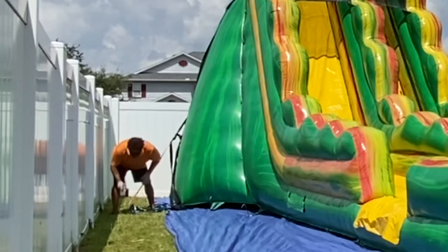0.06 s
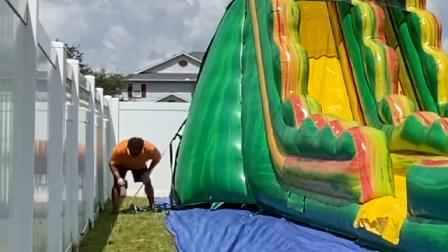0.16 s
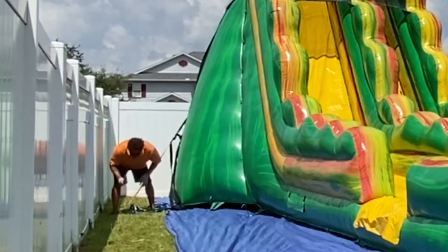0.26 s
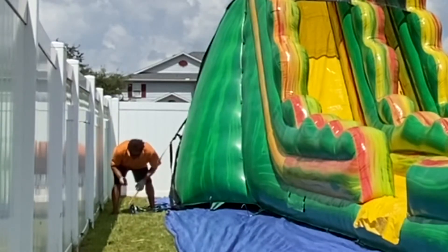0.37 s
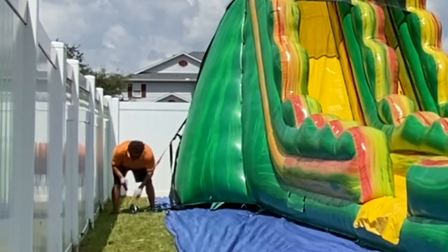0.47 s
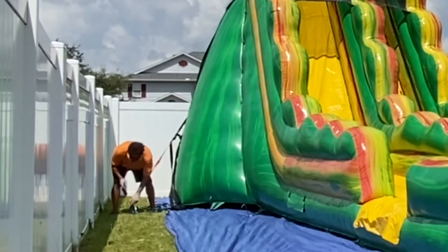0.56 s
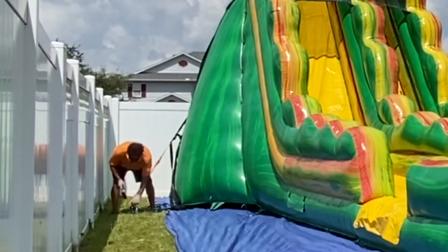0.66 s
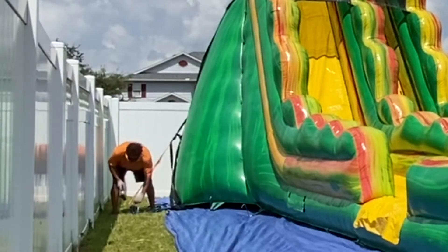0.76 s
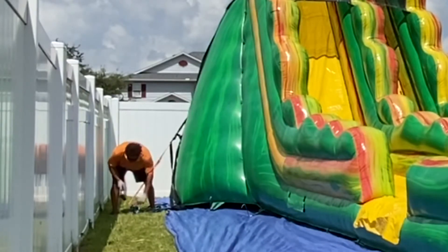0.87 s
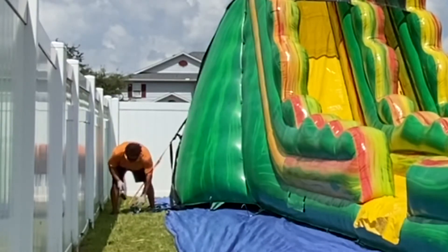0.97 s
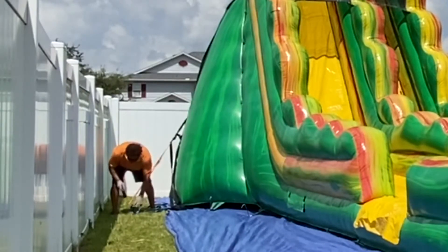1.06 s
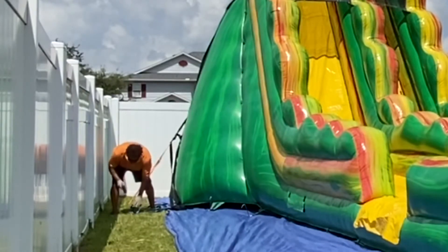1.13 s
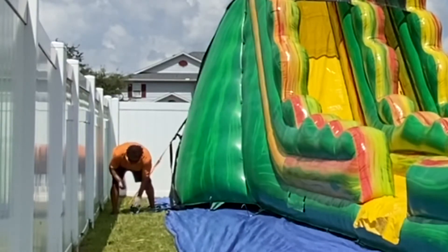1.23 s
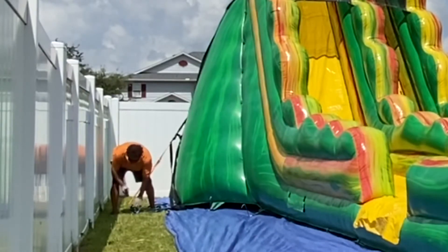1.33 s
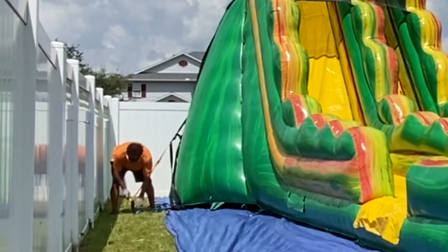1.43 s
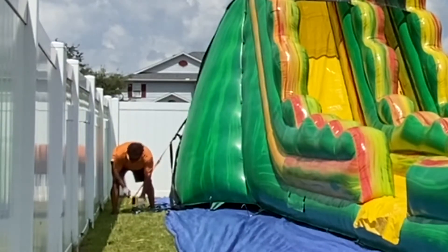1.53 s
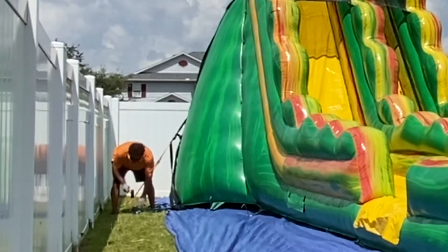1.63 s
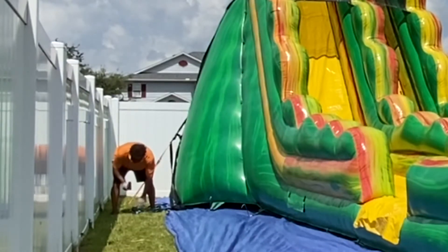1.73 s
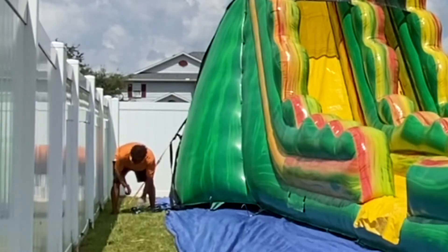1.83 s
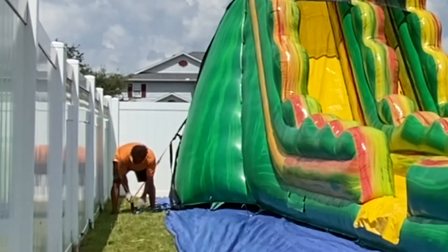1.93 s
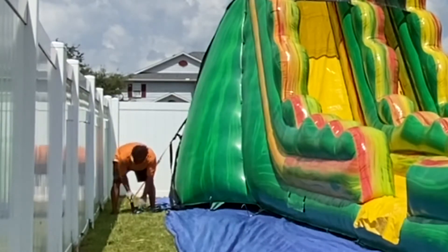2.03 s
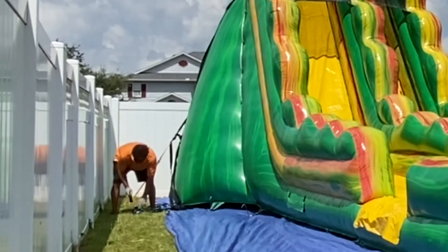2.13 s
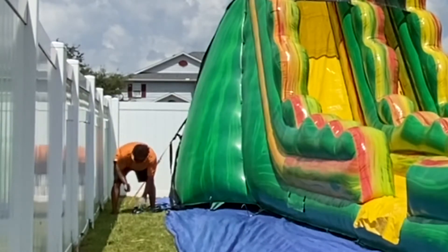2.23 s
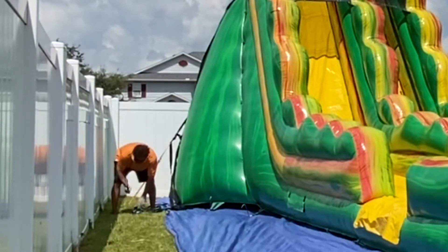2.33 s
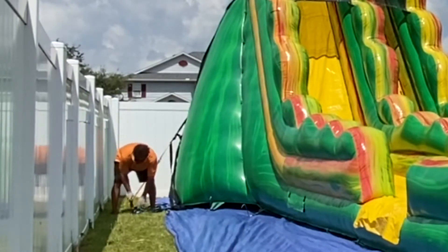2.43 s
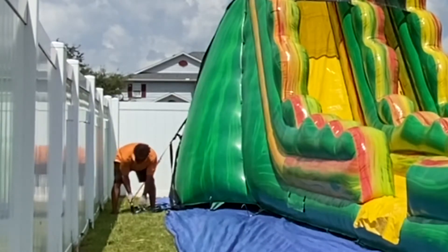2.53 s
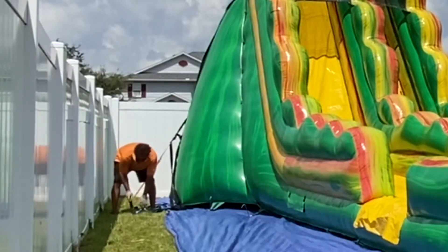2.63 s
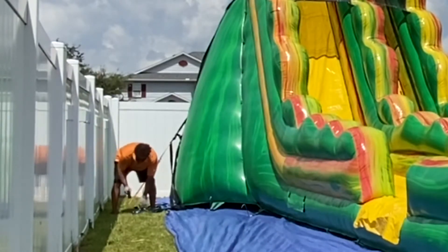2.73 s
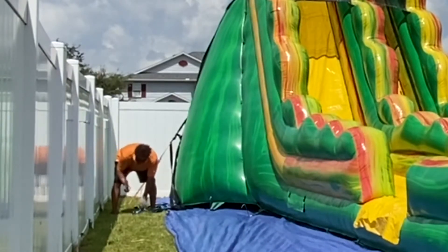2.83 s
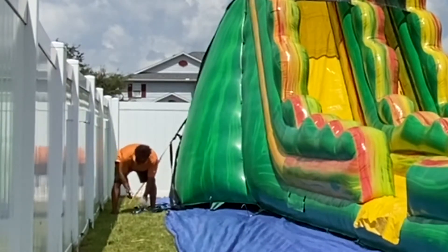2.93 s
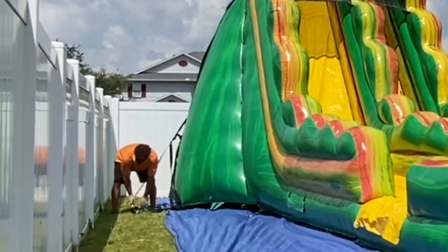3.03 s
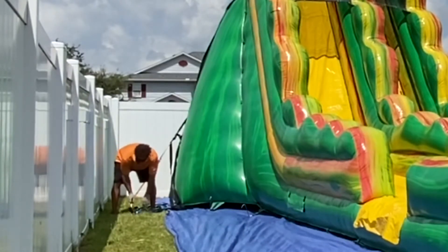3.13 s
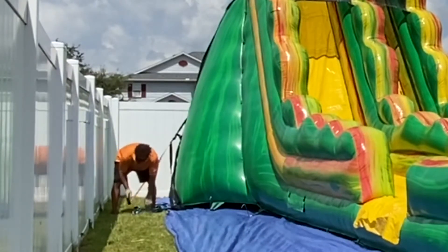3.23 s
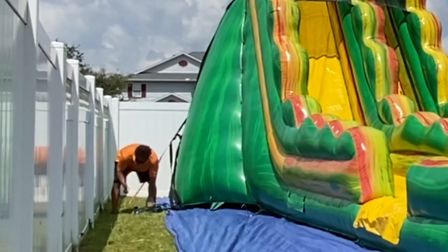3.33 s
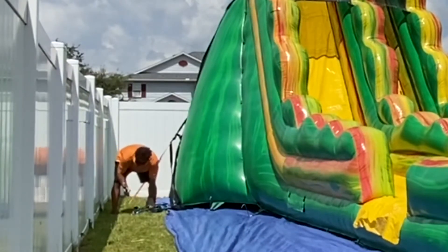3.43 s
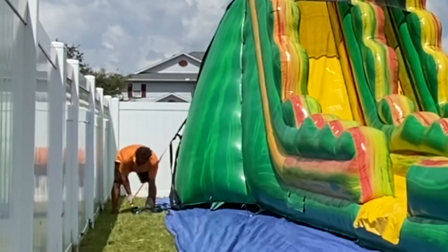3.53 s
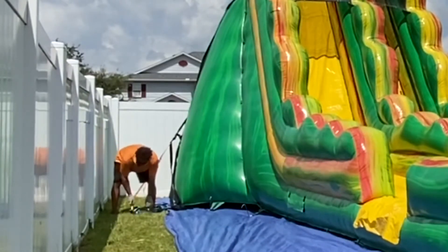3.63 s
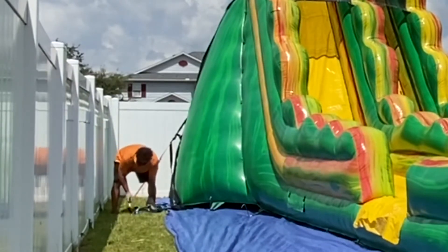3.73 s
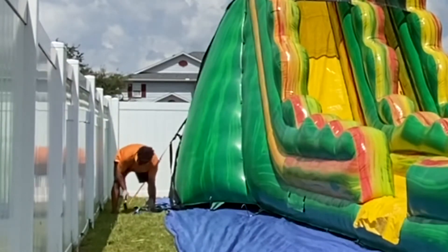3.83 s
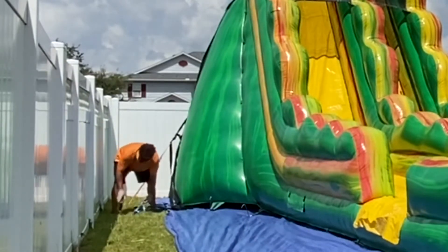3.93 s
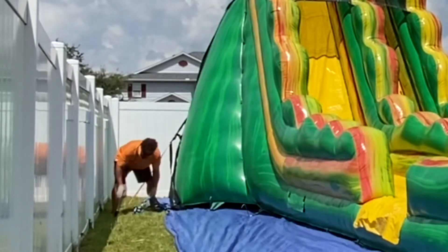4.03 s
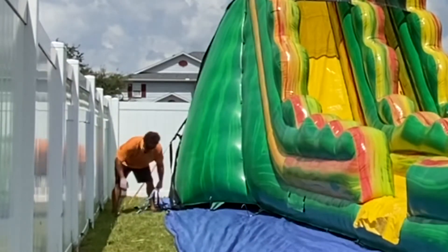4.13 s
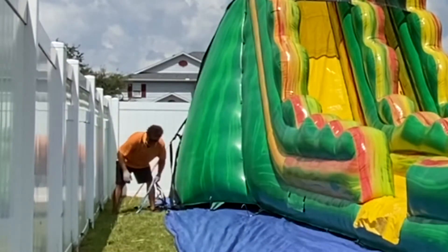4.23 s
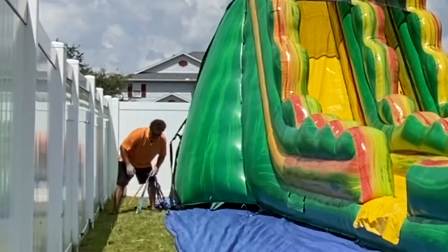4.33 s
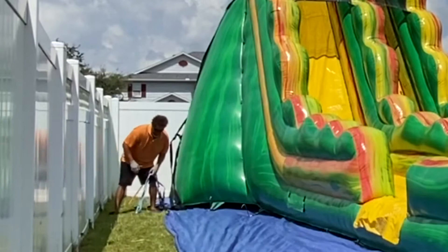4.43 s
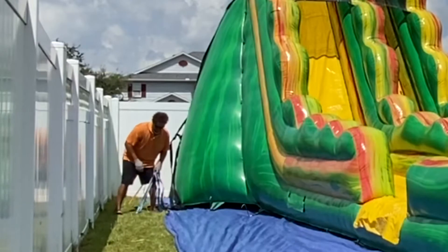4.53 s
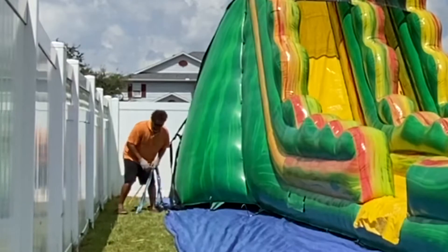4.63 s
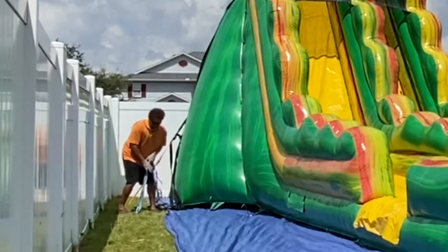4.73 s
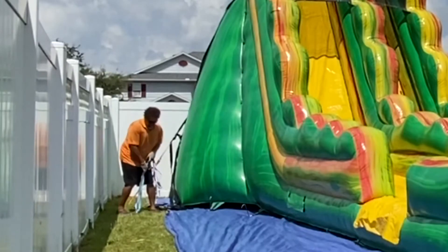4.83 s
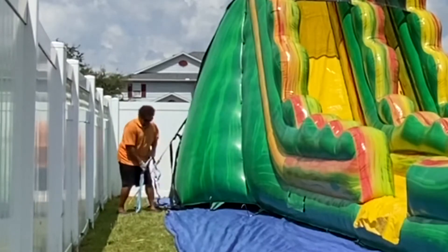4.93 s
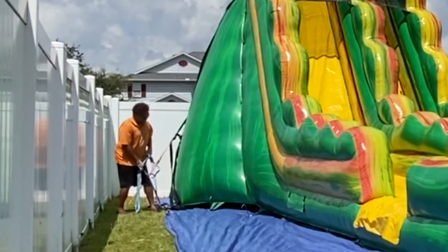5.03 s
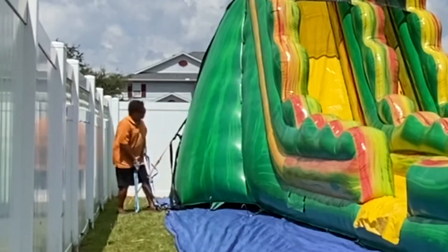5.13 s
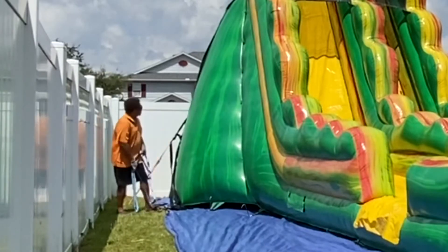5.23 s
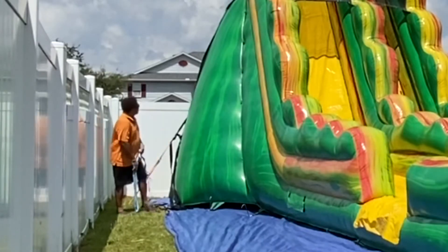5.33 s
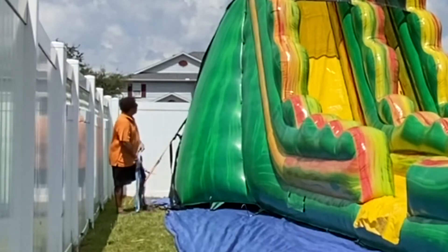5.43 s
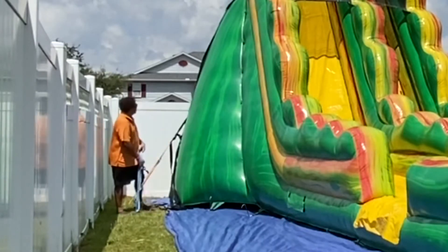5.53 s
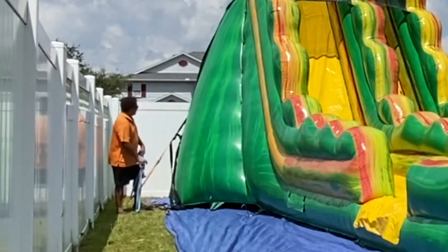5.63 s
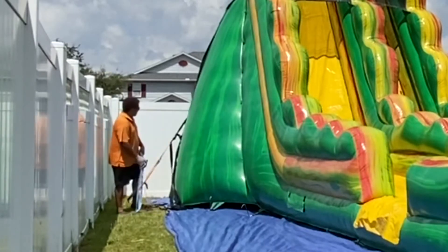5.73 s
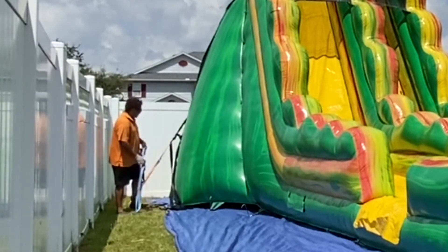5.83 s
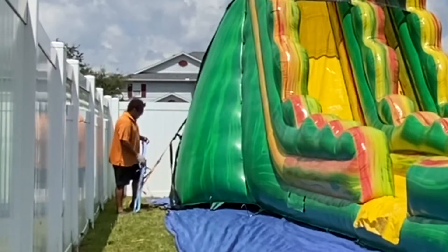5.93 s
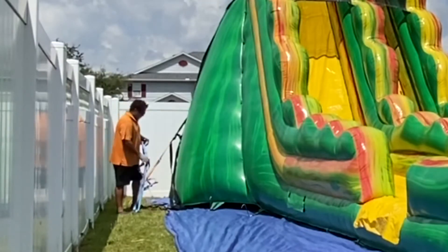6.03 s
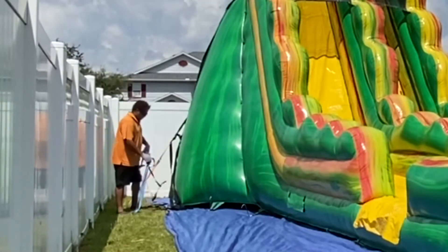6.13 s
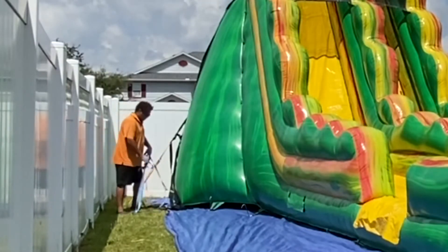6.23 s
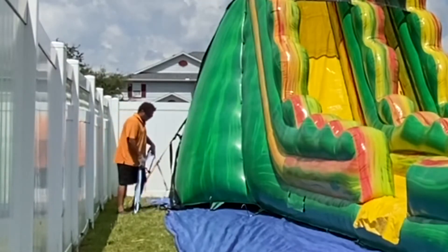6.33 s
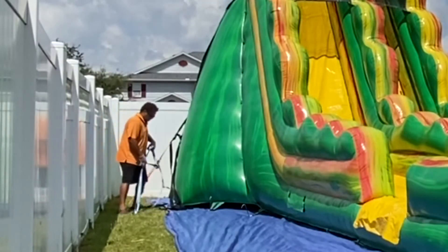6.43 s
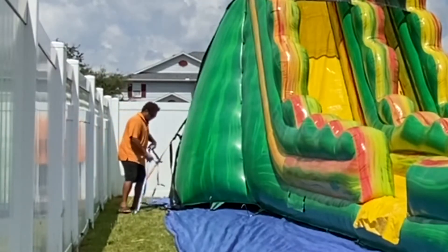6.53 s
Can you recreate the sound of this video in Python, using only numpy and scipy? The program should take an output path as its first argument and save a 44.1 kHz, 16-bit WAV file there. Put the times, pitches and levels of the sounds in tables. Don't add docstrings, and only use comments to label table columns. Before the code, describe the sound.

A steel hammer clangs brightly on a metal stake while a heavy mallet thuds nearby, over the steady rumbling rush of an air blower.

```python
import sys
import numpy as np
from scipy import signal
from scipy.fft import rfft, irfft, next_fast_len
from scipy.io import wavfile
from scipy.ndimage import uniform_filter1d, map_coordinates

SR = 44100
rng = np.random.default_rng(int(sys.argv[2]) if len(sys.argv) > 2 else 0)


def invert_db(level):
    return 10 ** (np.asarray(level, dtype=float) / 20)


def bounce(signal):
    frames = np.transpose(np.atleast_2d(signal))
    limited = np.clip(frames, -1, 1)
    pcm = np.round(limited * 32767).astype(np.int16)
    wavfile.write(sys.argv[1], SR, pcm)


N = 290619
WALL_S = 0.12
LAG = 20


def unit(x):
    return x / np.sqrt(np.mean(x ** 2) + 1e-20)


def along(points, hz):
    f, v = np.transpose(points)
    return np.interp(np.log(hz + 1), np.log(f + 1), v)


def wobble(rate):
    knots = rng.standard_normal(int(N * rate / SR) + 4)
    return map_coordinates(knots, [np.arange(N) * rate / SR])


def filtered(x, response):
    m = next_fast_len(x.shape[-1] + 4096)
    spectrum = rfft(x, m) * response(np.fft.rfftfreq(m, 1 / SR))
    return irfft(spectrum, m)[..., :x.shape[-1]]


# hz, left_right_likeness (-1 to 1)
COHERENCE = [(60, 0.97), (130, 0.96), (290, 0.52), (640, 0.0093), (1400, -0.27), (6800, 0.14),
             (8500, -0.51), (10000, 0.52), (15000, -0.12)]


def rush(gain_db, patchy_db):
    z = signal.stft(rng.standard_normal((2, N)), nperseg=512)[2]
    eddies = rng.standard_normal(z.shape[1:])
    eddies = uniform_filter1d(uniform_filter1d(eddies, 6, 0), 14, 1)
    pair = signal.istft(z * invert_db(patchy_db * unit(eddies)), nperseg=512)[1][:, :N]

    def mid_side(hz):
        angle = np.arccos(np.clip(along(COHERENCE, hz), -1, 1)) / 2
        return invert_db(gain_db(hz)) * np.array([np.cos(angle), np.sin(angle)])

    mid, side = filtered(pair, mid_side)
    return unit(np.array([mid + side, mid - side]))


# time_s, level_db
LOAD = [(0, 1.5), (1.3, 0.5), (2.6, 0), (3.9, 1), (5.2, 0), (6.59, 0.5)]
# frequency_hz, density_db (per Hz)
RUMBLE_SPECTRUM = [(15, -59), (25, -55), (36, -18), (69, -3.5), (123, -4), (147, -2.5), (204, -2),
                   (241, -7), (310, -7.5), (350, -16.5), (395, -7.5), (525, -20), (708, -21.5),
                   (741, -26.5), (900, -31), (1170, -37), (1980, -120)]
# centre_hz, width_hz, gain_db
DUCT_RESONANCES = [(123.3, 6.8, 7), (216.4, 23.6, 5.5), (239.7, 18.7, -13.5), (270.5, 44, 2),
                   (321.6, 11.3, 4.5), (374.4, 12, -1.5), (552, 14, -10), (555, 22, 6.5)]
# frequency_hz, density_db (per Hz)
HISS_SPECTRUM = [(300, -38), (600, -16), (1000, -3.5), (2000, -3.5), (3000, -9), (7000, -10.5),
                 (8200, -14.5), (9250, -18.5), (10300, -19), (12200, -21), (13000, -29), (14500, -22),
                 (15600, -22.5), (17000, -15)]
# (amplitude, before a common 5 dB lift)
BLADE_TONES = [(693.5, -53.5), (862, -76.5), (1001, -64), (1120, -67.5), (1260, -68.5), (1388, -66.5)]


def blower():
    rumble_db, hiss_db, hiss_follows = -31.5, -46, 0.11
    load_db = np.interp(np.arange(N) / SR, *np.transpose(LOAD))

    def duct(hz):
        gain_db = along(RUMBLE_SPECTRUM, hz)
        for centre_hz, width_hz, db in DUCT_RESONANCES:
            gain_db = gain_db + db * np.exp(-((hz - centre_hz) / width_hz) ** 2 * 2)
        return gain_db

    rumble_level = invert_db(rumble_db + load_db + 1.05 * wobble(6))
    rumble = rumble_level * rush(duct, patchy_db=1.26)
    hiss_level = invert_db(hiss_db + hiss_follows * load_db + 0.52 * wobble(3.05))
    hiss = hiss_level * rush(lambda hz: along(HISS_SPECTRUM, hz), patchy_db=1.38)

    turns = np.cumsum(1 + 0.00298 * wobble(8)) / SR
    tone = 0
    for hz, db in BLADE_TONES:
        flicker_db = 2.5 * np.array([wobble(12.0), wobble(13)])
        tone = tone + invert_db(db + 5 + flicker_db) * np.sin(2 * np.pi * hz * turns + [[0], [1.9]])
    return rumble + hiss + tone * invert_db([[-1.5], [1.5]])


def ring(modes, t, swell, hold):
    out = 0
    for hz, blur_hz, db, t60 in modes:
        steps = rng.standard_normal((3, len(t))) * np.sqrt(2 * np.pi * blur_hz / SR)
        phase = np.cumsum(0.8 * steps[0] + 0.43 * steps[1:], axis=1)
        scatter_db = rng.normal(0, 1.5, (2, 1))
        level = invert_db(db + scatter_db - 60 * np.maximum(t - hold, 0) / t60)
        out = out + level * np.sin(2 * np.pi * hz * t + phase)
    out = out * (1 - np.exp(-t / swell))
    return np.array([out[0], np.roll(out[1], LAG)])


# frequency_hz, t60_s
YARD_DECAY = [(200, 0.58), (1500, 0.37), (5000, 0.45), (12000, 0.14)]


def yard(spectrum, t, start, cluster, alike, lead_db, tail_db):
    shared = np.tile(rng.standard_normal(len(t)), (2, 1))
    shared[1] = np.roll(shared[1], LAG)
    echoes = alike * shared + np.sqrt(1 - alike ** 2) * rng.standard_normal((2, len(t)))
    cluster_level = invert_db(-60 * np.maximum(t - start - cluster, 0) / 0.01)
    early = echoes * np.where(t < start, invert_db(lead_db), cluster_level)

    _, frames, z = signal.stft(rng.standard_normal((2, len(t))), SR, nperseg=256)
    hz = np.fft.rfftfreq(256, 1 / SR)
    decay = invert_db(-60 * frames / along(YARD_DECAY, hz)[:, None])
    tail = signal.istft(z * decay, SR, nperseg=256)[1][:, :len(t)]

    colour = invert_db(along(spectrum, np.linspace(0, SR / 2, num=512)))
    both = early + invert_db(tail_db) * tail * (t > start)
    return filtered(both, lambda hz: invert_db(along(spectrum, hz))) / np.sqrt(np.mean(colour ** 2))


def add(track, x, s):
    track[:, round((s + 1) * SR):][:, :x.shape[1]] += x


# start_s, ring_db, deadness_db (crack over ring), low_db (low over high group)
HAMMER_BLOWS = [
    (-.11, -26, -8, -11),
    (1.371, -17, -2.5, -5.5),
    (1.892, -14.5, -4.5, -4.5),
    (2.435, -15, -2, -1.5),
    (2.987, -16.5, -0.5, -3.5),
    (3.530, -23.5, 6.5, 4),
]
# pitch_hz, blur_hz, level_db, t60_s
STEEL_LOW_MODES = [(4980, 300, -4, 0.1), (4860, 35, -6.5, 0.14), (4956, 27, -9.5, 0.31),
                   (5100, 56, -20, 0.19), (5280, 86, -21, 0.089)]
STEEL_HIGH_MODES = [(6740, 71, -24.5, 0.26), (7800, 250, -6, 0.052), (8170, 61, -18, 0.068),
                    (8103, 22, -3.5, 0.36), (8200, 20, 0.5, 0.17), (10500, 95, -16.5, 0.32),
                    (11420, 68, -21, 0.17), (12300, 200, -29, .1), (15500, 150, -25, 0.19)]
# pitch_hz, blur_hz, level_db, t60_s
SHANK_MODES = [(195.4, 33, -2.5, 0.14), (547, 22, -6, 0.065), (829, 47, -9, 0.086), (1460, 57, -12, 0.1),
               (1780, 47, -12, 0.16)]
# frequency_hz, density_db (per Hz)
CRACK_SPECTRUM = [(600, -28), (1200, -9), (1900, -5.5), (3500, -4.5), (5000, -11), (5800, -24), (8000, 5),
                  (9300, -10), (11000, 3), (13300, -23), (15300, -1), (16500, -45)]


def hammer():
    out, t = np.zeros((2, N + 2 * SR)), np.arange(SR // 2) / SR
    swell_s, damping = 0.0028, 3.7
    thump_db, thump_grows = -9.5, 1.7
    for s, ring_db, dead_db, low_db in HAMMER_BLOWS:
        flutter_low, flutter_high = [invert_db(2.27 * wobble(rate)[:len(t)]) for rate in (107, 98)]
        low = invert_db(low_db) * flutter_low * ring(STEEL_LOW_MODES, t, swell_s, 0.0097)
        high = flutter_high * ring(STEEL_HIGH_MODES, t, swell_s, 0.0038)
        steel = invert_db(ring_db - damping * (dead_db + 12.5) * t) * (low + high)
        thump = invert_db(ring_db + thump_db + thump_grows * dead_db) * ring(SHANK_MODES, t, 0.0091, 0.013)
        crack = yard(CRACK_SPECTRUM, t, 0.00041, 0.015, 0.27, lead_db=-22, tail_db=0.5)
        blow = steel + thump + invert_db(ring_db + dead_db - 13.5) * crack
        add(out, blow, s)
        add(out, invert_db(-16) * filtered(blow, lambda hz: 1 / (1 + (hz / 6500) ** 2)), s + WALL_S)
    return out[:, SR:SR + N]


# start_s, force_db, ring_db (head over its usual level)
MALLET_BLOWS = [
    (0.4541, -12, 1),
    (1.395, -11, -2),
    (2.3598, -7.5, 0.5),
    (3.2631, -7, -1),
]
# pitch_hz, blur_hz, level_db, t60_s
HEAD_MODES = [(549, 19, -5, 0.13), (1111, 130, -9.5, 0.023), (1640, 26, -1, 0.04), (2069, 69, -3, 0.021),
              (2440, 64, -17, .03), (3240, 200, -7, 0.027), (3740, 22, -11.5, 0.061),
              (5210, 180, -11, 0.016), (6100, 190, -11, 0.016)]
# frequency_hz, density_db (per Hz)
KNOCK_SPECTRUM = [(90, -3), (200, -3.5), (500, -5.5), (900, -9.5), (2000, -13), (3500, -19), (5000, -24.5),
                  (8000, -17), (9300, -20.5), (11300, -20.5), (13300, -53), (15300, -22), (16500, -60)]
# pitch_hz, level_db, delay_s, rise_s, t60_s
BOOM_MODES = [(72, 5, 0.024, 0.019, 0.18), (94.7, -7.5, 0.0616, 0.011, 0.12),
              (168, -4, .0255, 0.001, 0.027), (125.7, -4.5, 0.0073, 0.023, 0.16),
              (181.4, -4.5, .0025, 0.0023, 0.14), (283.4, -11, -.001, 0.00067, 0.075),
              (379, -15.5, .004, 0.0042, 0.1)]


def mallet():
    out, t = np.zeros((2, N + 2 * SR)), np.arange(SR // 2) / SR
    head_db, knock_db, knock_grows = -6.5, -17, 0.48
    for s, force_db, square_db in MALLET_BLOWS:
        head = invert_db(force_db + head_db + square_db) * ring(HEAD_MODES, t, 0.0036, 0.0053)
        add(out, head, s + 0.0045)

        knock = yard(KNOCK_SPECTRUM, t, 0.009, 0.011, 0.92, lead_db=-18, tail_db=-2.5)
        knock = invert_db(knock_db + knock_grows * force_db) * knock
        add(out, knock, s - 0.0035)
        add(out, invert_db(-26) * knock, s + WALL_S)

        boom = 0
        for hz, db, delay, rise, t60 in BOOM_MODES:
            u = np.maximum(t - delay, 0)
            level = invert_db(db - 60 * u / t60) * (1 - np.exp(-u / rise))
            boom = boom + level * np.sin(2 * np.pi * hz * u)
        boom = filtered(boom, lambda hz: hz ** 4 / (hz ** 4 + 38 ** 4))
        add(out, invert_db(force_db) * boom * invert_db([[0.5], [-0.5]]), s)
    return out[:, SR:SR + N]


def scene():
    return blower() + hammer() + mallet()


# from_hz, to_hz
WEAK_BANDS = [(8550, 9000), (9000, 9600), (9600, 10300), (11650, 12400), (12400, 13800), (13800, 14200),
              (15750, 16500)]
WEAK_LIMITS = [-93.5, -85, -87, -91, -78, -89, -66]


def starve(x, mask_db):
    hz, _, z = signal.stft(x, SR, nperseg=2048)
    power = uniform_filter1d(abs(z.mean(axis=0)) ** 2, size=2, axis=1)

    def level(lo_hz, hi_hz):
        band = power[(hz >= lo_hz) & (hz < hi_hz)]
        return 10 * np.log10(abs(band.mean(axis=0)) + 1e-20)

    masked = level(6500, 8400) + mask_db
    attack = np.diff(level(10300, 11600), prepend=0) > 9
    for (lo_hz, hi_hz), limit_db in zip(WEAK_BANDS, WEAK_LIMITS):
        threshold = np.maximum(limit_db, masked) + rng.normal(0, 1.2, len(masked))
        z[:, (hz >= lo_hz) & (hz < hi_hz)] *= attack | (level(lo_hz, hi_hz) > threshold)
    return signal.istft(z * (hz < 16050)[:, None], SR, nperseg=2048)[1][:, :N]


def band_limit(x):
    return signal.sosfilt(signal.butter(12, 17000, fs=SR, output="sos"), x)


def record(dry):
    mix = starve(dry, mask_db=-15.5)
    return band_limit(mix)


dry = scene()
out = record(dry)
bounce(out)
```